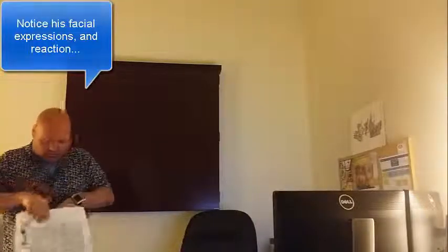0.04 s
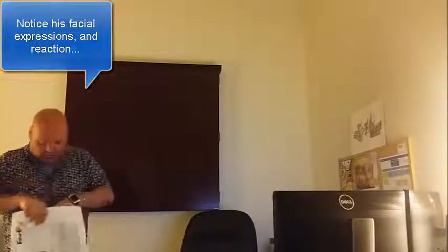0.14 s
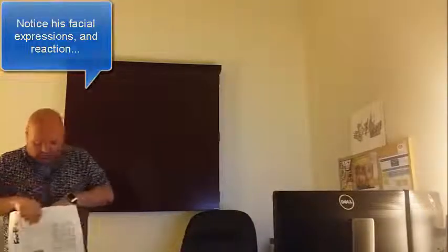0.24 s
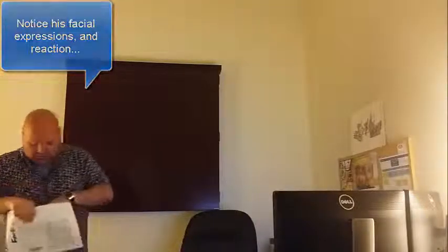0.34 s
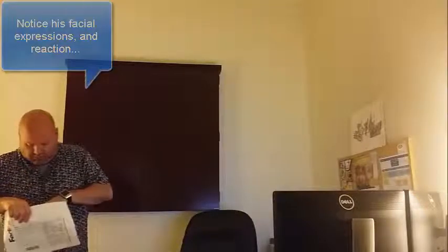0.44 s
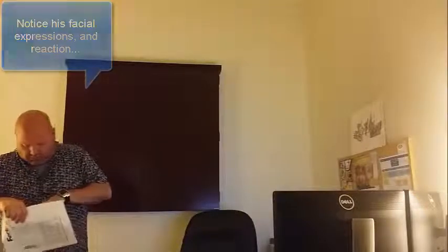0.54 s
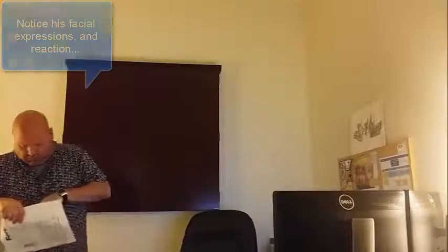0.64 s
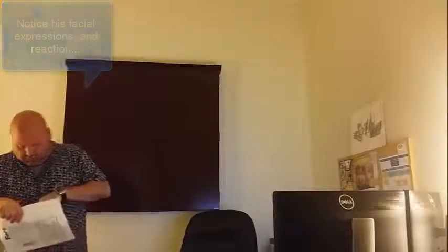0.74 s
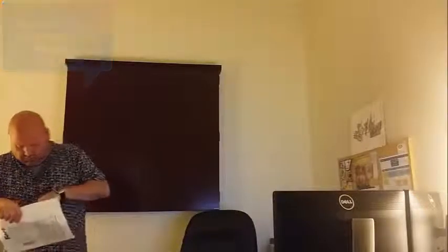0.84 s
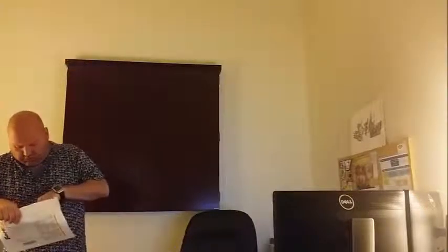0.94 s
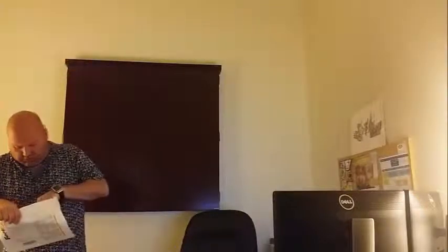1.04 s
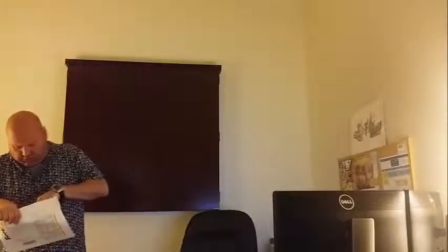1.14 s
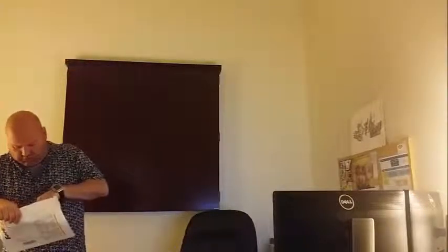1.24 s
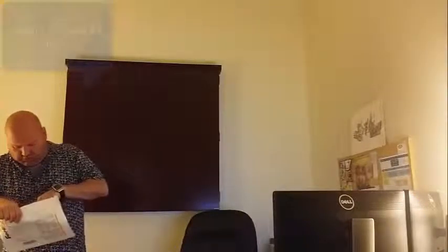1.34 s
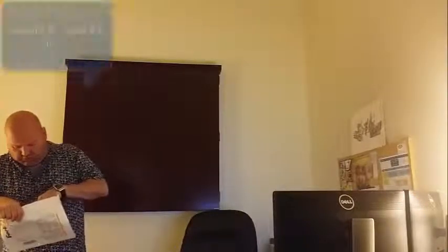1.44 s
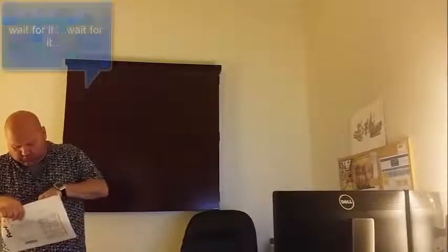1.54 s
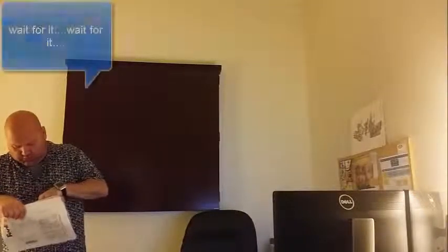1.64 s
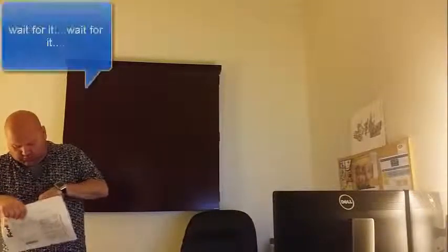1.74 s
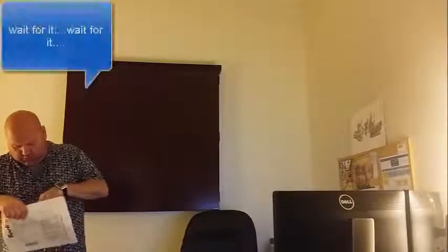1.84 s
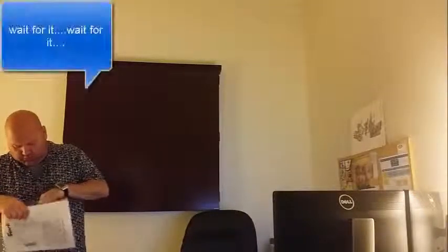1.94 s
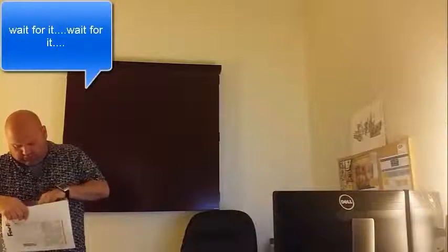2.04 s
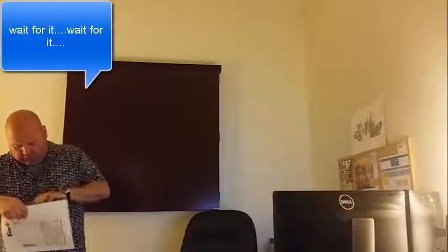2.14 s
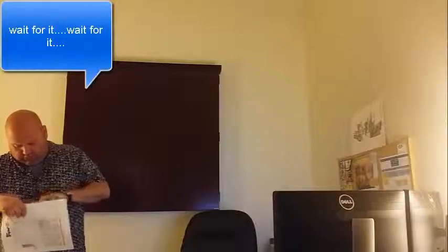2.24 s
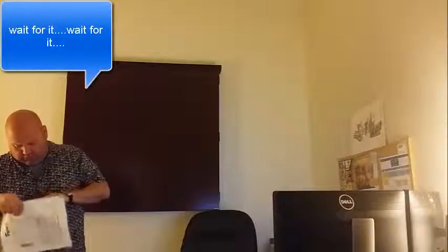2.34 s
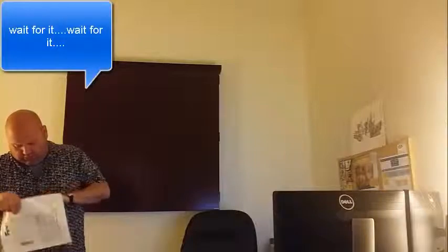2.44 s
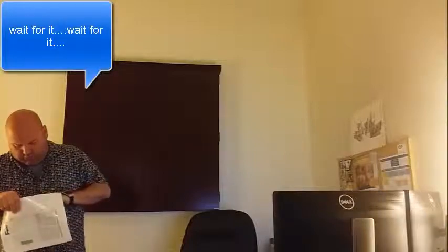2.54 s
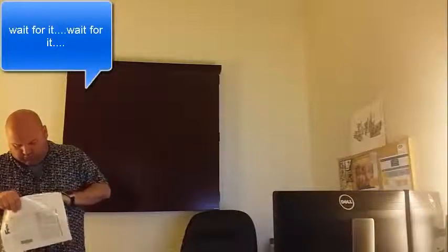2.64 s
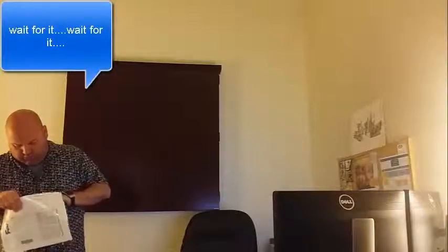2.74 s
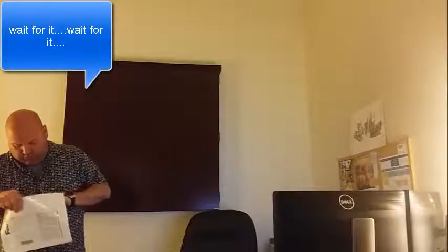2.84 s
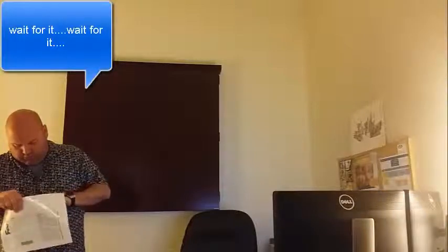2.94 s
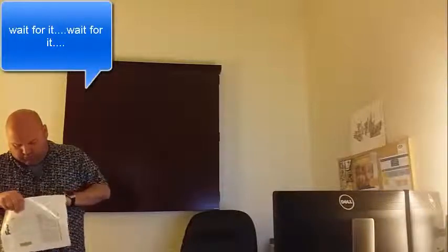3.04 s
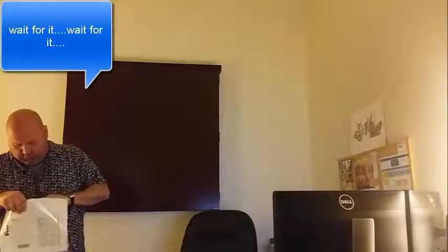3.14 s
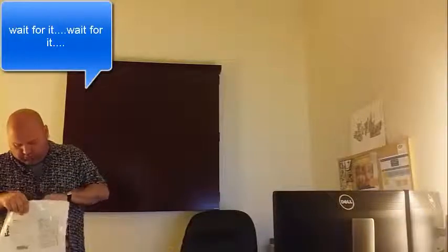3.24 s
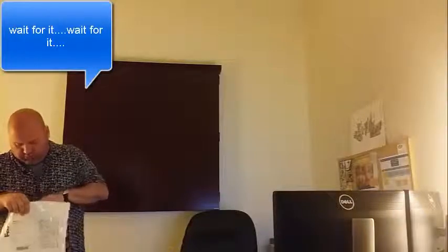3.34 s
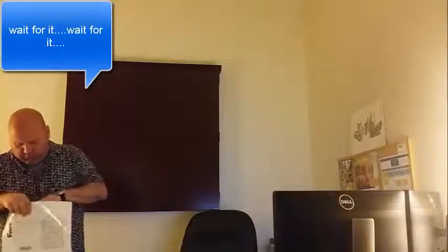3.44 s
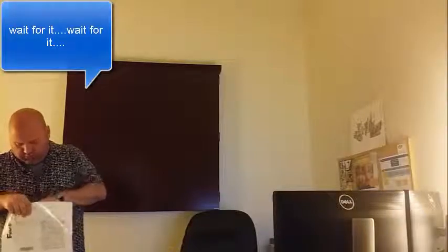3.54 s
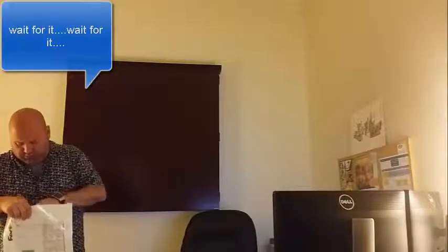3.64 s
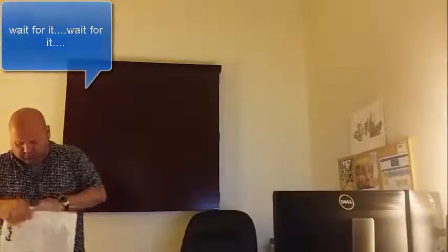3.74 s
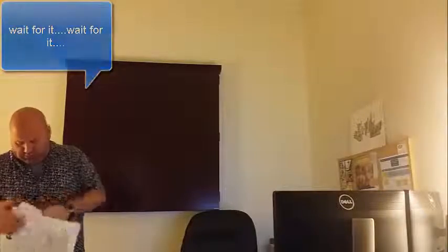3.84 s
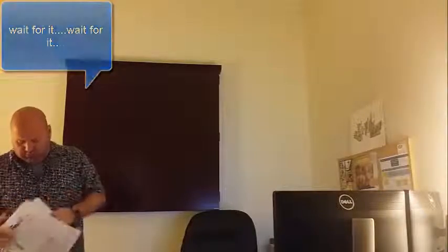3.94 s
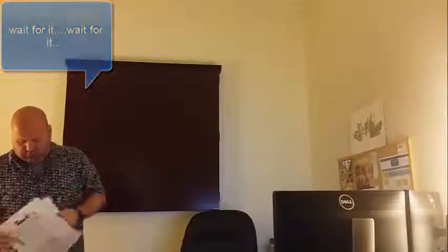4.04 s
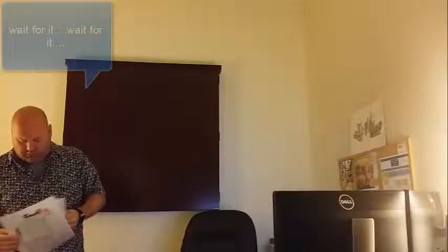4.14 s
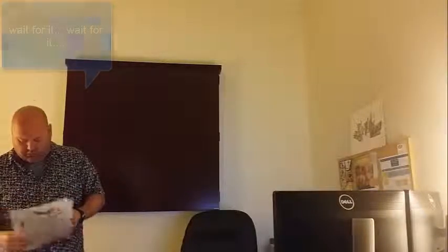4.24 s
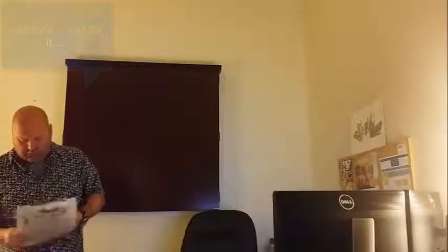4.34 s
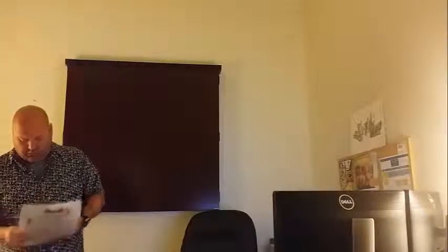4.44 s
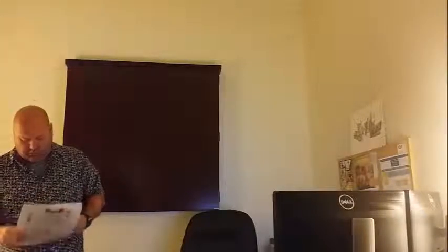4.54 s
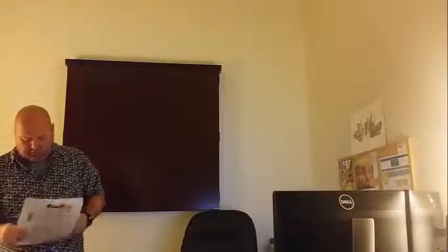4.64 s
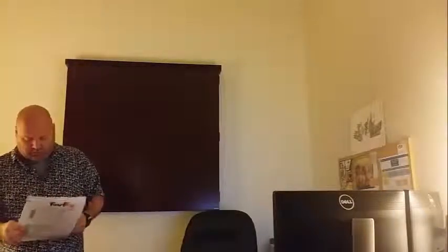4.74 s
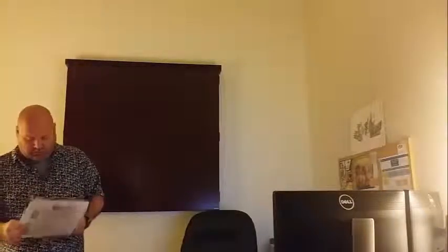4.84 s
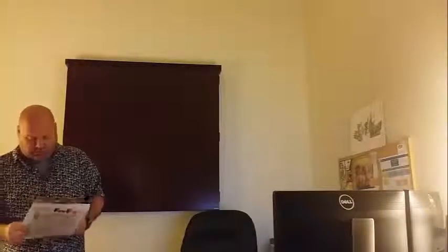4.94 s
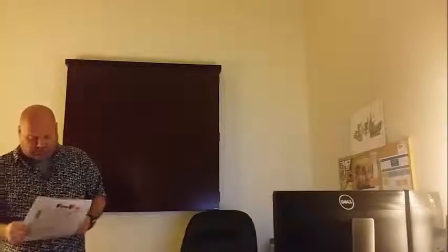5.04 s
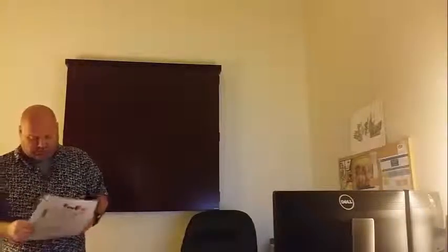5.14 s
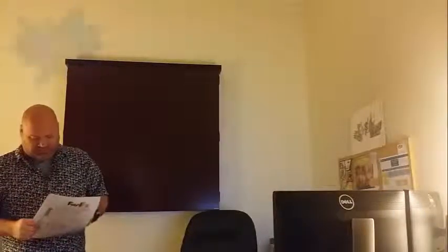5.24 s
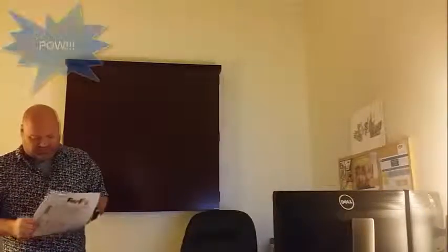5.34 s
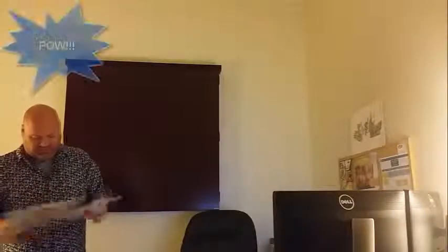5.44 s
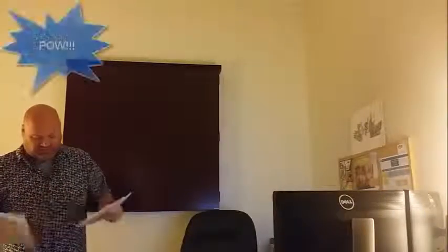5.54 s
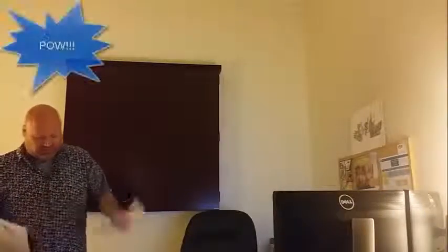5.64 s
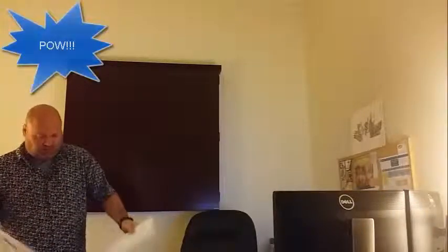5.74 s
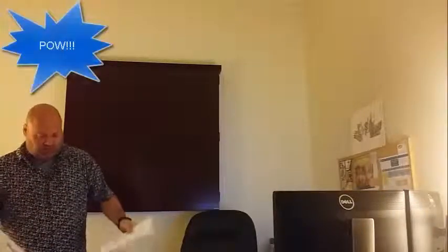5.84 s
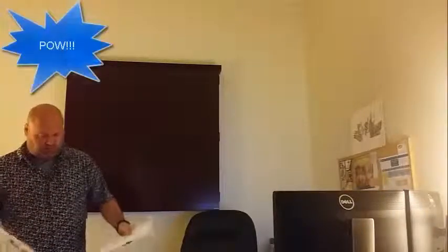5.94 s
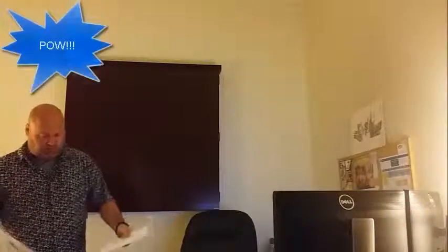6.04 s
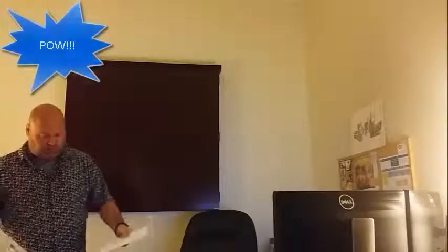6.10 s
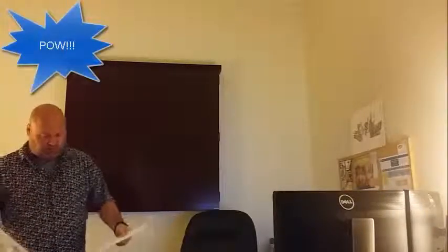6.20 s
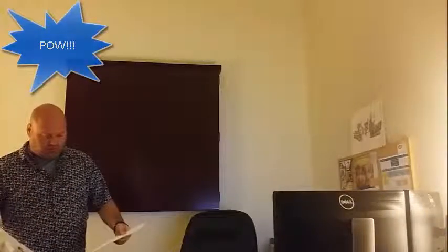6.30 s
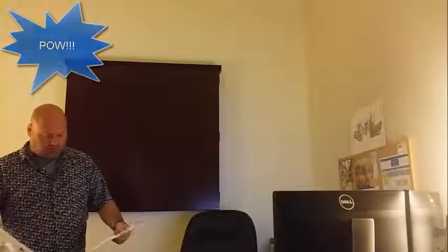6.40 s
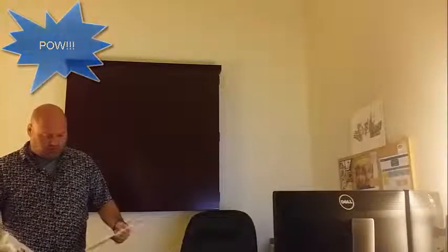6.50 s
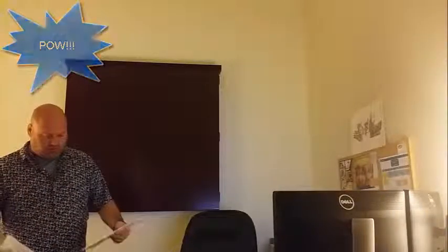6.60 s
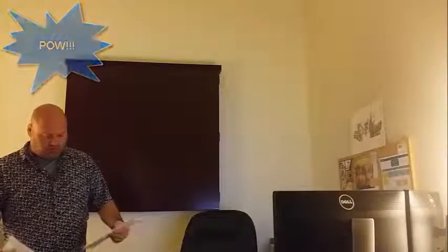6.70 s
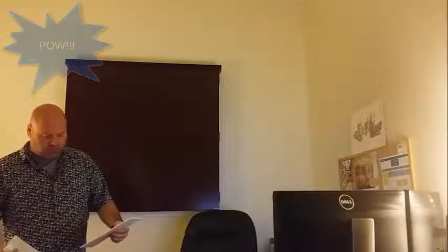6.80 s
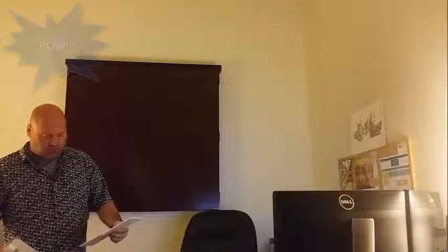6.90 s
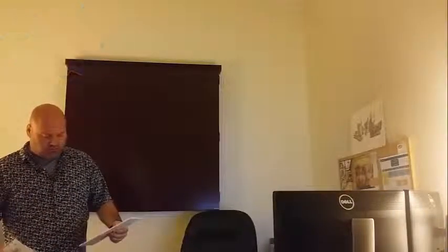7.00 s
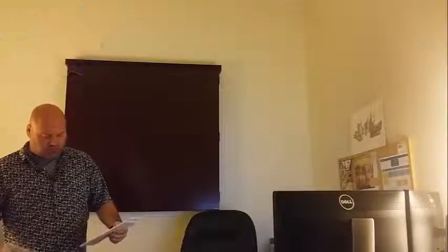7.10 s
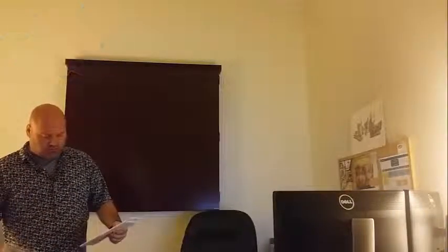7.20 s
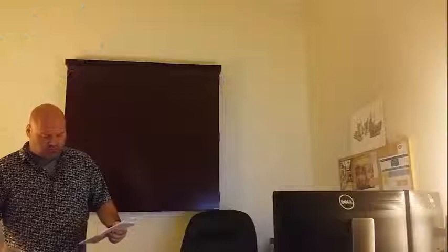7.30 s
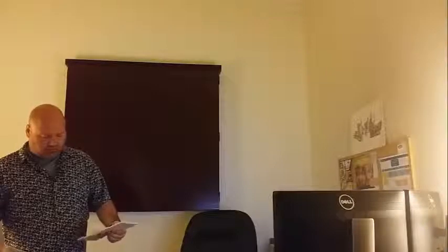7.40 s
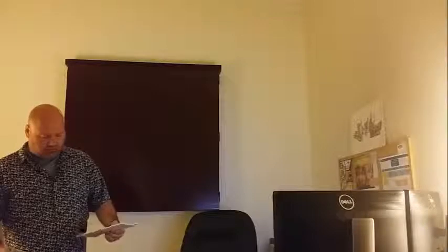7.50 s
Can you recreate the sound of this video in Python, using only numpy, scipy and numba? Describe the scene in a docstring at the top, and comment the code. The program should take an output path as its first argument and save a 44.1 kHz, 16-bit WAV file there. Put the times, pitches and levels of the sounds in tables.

```python
"""Small bare office: a stiff paper envelope is handled, then a popper inside it bangs and its shell drops on the desk.
Ventilation is shaped noise; finger strokes are uneven noise under envelopes, through changing room answers.
Snaps are short bursts plus dull notes; the bang is a filtered room answer with ringing, low modes and flutter.
The bang overloads the recorder, whose gain control ducks and slowly lets the room back in."""
import sys
import numpy as np
from scipy import signal
from scipy.fft import rfft, irfft, next_fast_len
from scipy.io import wavfile
from scipy.ndimage import map_coordinates
from numba import njit

SR = 44100
rng = np.random.default_rng(int(sys.argv[2]) if len(sys.argv) > 2 else 0)


def attenuation_scalar(level_db):
    """Turn a level in dB into a linear amplitude multiplier (20 dB per decade)."""
    decades = np.asarray(level_db, float) / 20
    return 10 ** decades


def log_audio(samples):
    """Write samples as a 16-bit WAV file to the path given in sys.argv[1]."""
    # one column per channel
    frames = np.atleast_2d(samples).T
    # limit to full scale, then quantise
    limited = np.clip(frames, -1, 1)
    pcm = np.round(limited * 32767).astype(np.int16)
    wavfile.write(sys.argv[1], SR, pcm)


N = 333528

# ventilation rumble spectrum: (frequency [Hz], relative density [dB])
RUMBLE_SPECTRUM = [(12, -54), (20, -40), (27, -33), (39, -16.5), (75, -12.5), (102, -3.5), (152, 1),
                   (237, -7), (269, -15), (347, -21), (379, -25.5), (420, -28.5), (550, -50.5), (920, -120)]
# ventilation hiss spectrum: (frequency [Hz], relative density [dB])
HISS_SPECTRUM = [(180, -23), (300, -3), (379, -18), (546, -2.5), (689, -11.5), (870, -0.5), (1030, 1),
                 (1840, -7), (2140, -12), (2320, -9), (2570, -14), (4520, -25), (11900, -31),
                 (14400, -33.5), (15200, -73.5)]
RUMBLE_DB, HISS_DB = -45, -53

# office reverberation: (frequency [Hz], decay by 60 dB [s])
OFFICE_T60 = [(100, 0.27), (300, 0.3), (1000, 0.67), (2000, 0.62), (4000, 0.72), (8000, 0.62),
              (14000, 0.46)]

# finger strokes over paper, the long faint ones are hands shifting their hold:
# (start [s], length [s], relative slide hiss level [dB], relative sheet body level [dB])
STROKES = [(0.0, .02, -83, -46), (0.034, 0.013, -45, -41.5), (0.05, 0.06, -64, -41),
           (0.182, 0.067, -57.5, -56), (0.27, 0.14, -67, -62), (0.563, 0.047, -67, -52),
           (0.62, 0.13, -75, -56), (0.824, 0.011, -66, -55), (1.015, 0.011, -62, -54),
           (1.604, 0.15, -72, -66), (1.968, 0.05, -54, -46), (2.061, 0.0047, -50.5, -38),
           (2.1, .25, -76, -67), (2.384, 0.018, -52.5, -38.5), (2.415, 0.034, -60, -62),
           (2.461, 0.0055, -66, -37), (3.14, 0.13, -66.5, -52.5), (3.328, 0.022, -64.5, -51.5),
           (3.405, 0.053, -72, -50.5), (3.47, 0.28, -59, -52), (3.769, 0.036, -46, -45),
           (3.846, 0.026, -50.5, -39), (4.062, 0.027, -61, -57), (4.11, .12, -66, -60),
           (4.233, 0.16, -57.5, -56.5), (4.364, 0.12, -56, -55), (4.46, 0.029, -52, -43),
           (4.51, 0.086, -55, -55), (4.57, 0.093, -51, -49), (4.93, 0.042, -80, -54.5),
           (5.121, 0.095, -61, -57), (5.241, 0.13, -51, -44.5), (5.46, .05, -54, -48.5),
           (7.302, .1, -78.5, -56), (7.5, .04, -70, -64)]
# fingers sliding on paper: (frequency [Hz], relative density [dB])
SLIDE_SPECTRUM = [(1180, -39), (2000, -4.5), (3170, -3), (4990, -4.5), (5580, -7), (8400, -2.5),
                  (14000, -17), (14700, -28), (15400, -74.5)]
# sheet body: (frequency [Hz], relative density [dB])
SHEET_SPECTRUM = [(150, -120), (280, 3.5), (600, -4), (950, 7.5), (1700, 0), (3000, -11.5), (6000, -120)]
RISE_DB_PER_S, FADE_DB_PER_S = 599, 450  # stroke onset and release

# snapping creases, the low-pitched ones are the envelope bumping hand or body:
# (time [s], relative crisp level [dB], dull level over crisp before pitch correction and trims [dB],
#  dull pitch [Hz], left over right [dB])
CREASE_SNAPS = [(0.0333, -37.5, 12.5, 870, -1.5), (0.0698, -40, 15, 950, -4), (0.4694, -50, -2, 1040, -4),
                (0.6894, -52, 2, 1230, -4), (0.8324, -49, -2, 571, -1), (1.039, -57, 17, 568, -3.0),
                (1.948, -49, 12.5, 630, -1), (2.0707, -50.5, 15.5, 1020, -12),
                (2.3927, -42.5, 16, 2900, -4), (2.4604, -44.5, 16, 970, -5), (3.2424, -57.5, 9, 340, -7),
                (3.3995, -58.5, 23, 296, -4), (3.8192, -40.5, 6, 500, -7), (4.2793, -41, 10, 1150, -7),
                (4.3044, -37.5, 10.5, 1450, -2), (4.47, -39, 6, 520, -1.5), (4.7397, -43, 17, 1440, -1),
                (4.797, -17.5, -0.5, 1514, -2.5), (5.097, -57, 12, 1470, -7)]
# popper's shell dropping on the desk, same columns
SHELL_LANDING = [(5.832, -38, 13, 1600, -2)]
# crisp part of a snap: (frequency [Hz], relative density [dB])
CREASE_SPECTRUM = [(1180, -41.5), (2000, -4), (3170, -5), (5580, -5.5), (8400, -2.5), (12000, -16.5),
                   (14600, -13.5), (16000, -36), (17000, -88)]

BANG_S, BANG_DB = 5.511, -8.5  # level: blast rms over its first 20 ms
# blast: (frequency [Hz], relative density [dB])
BLAST_SPECTRUM = [(29, -57), (50, -17.5), (225, -2.5), (310, -12), (566, -12), (1260, -3), (1390, -3),
                  (1900, -3.5), (2050, -5), (3670, -10), (4450, -2), (5670, -11.5), (6890, -6.5),
                  (15000, -22.5), (16500, -55)]
# thin panels ringing on, blurred, after the blast:
# (frequency [Hz], width [Hz], level over blast [dB], decay by 60 dB [s])
PANEL_RINGS = [(1750, 300, -13.5, .5), (4430, 70, -24, 0.95), (4400, 290, -25.5, 0.55),
               (5195, 200, -24, .6)]
# low modes of office and desk: (frequency [Hz], peak over blast rms [dB], decay by 60 dB [s])
LOW_MODES = [(76.2, -23, .1), (139, -9.5, 0.1), (220.8, -8, 0.11), (470.4, -12, 0.13)]
FLUTTER_PERIOD_S, FLUTTER_HZ, FLUTTER_T60_S = 0.0096, 1596, 0.0053
FLUTTER_DB, FLUTTER_LOSS_DB = 1, 1  # base over blast rms; loss per slap, the first included

OVERLOAD_PEAK, DUCK_DB, DUCK_DB_PER_S, HOLD_S, RECOVER_S = 0.3, -17.5, 80, 0.78, 0.31


def unit(x):
    """x at rms 1."""
    return x / np.sqrt(np.mean(x ** 2) + 1e-20)


def along(points, hz):
    """(frequency [Hz], value) points read on a log frequency axis."""
    f, v = np.transpose(points)
    return np.interp(np.log(hz + 1), np.log(f + 1), v)


def coloured(x, spectrum):
    """x through a causal minimum-phase filter, made by folding the cepstrum of the magnitude."""
    size = 2 * next_fast_len(N // 2 + 8192)
    magnitude = attenuation_scalar(along(spectrum, np.fft.rfftfreq(size, 1 / SR)))
    cepstrum = irfft(np.log(magnitude + 1e-6), size)
    cepstrum[1:size // 2] *= 2
    cepstrum[size // 2 + 1:] = 0
    return irfft(rfft(x, size) * np.exp(rfft(cepstrum)), size)[..., :N]


def wobble(knots_per_s):
    """Smooth random curve through normal knots, at most 19 a second."""
    knots = rng.standard_normal(int(N * 20 / SR) + 4)
    return map_coordinates(knots, [np.arange(N) * min(knots_per_s, 19) / SR])


def ports(alike, left_db):
    """White noise at two microphone ports with a given likeness and left-over-right balance."""
    a, b = rng.standard_normal((2, N))
    angle = np.arccos(np.clip(alike, 0, 1)) / 2
    shared, own = np.cos(angle) * a, np.sin(angle) * b
    return np.array([shared + own, shared - own]) * attenuation_scalar([[left_db / 2], [-left_db / 2]])


def ventilation():
    """Low duct rumble shared by both ports, plus a diffuse hiss; both levels waver."""
    rumble = unit(coloured(ports(alike=1.0, left_db=-4.0), RUMBLE_SPECTRUM))
    rumble *= attenuation_scalar(RUMBLE_DB + 0.43 * wobble(7.7))
    hiss = unit(coloured(ports(alike=0.16, left_db=-1.0), HISS_SPECTRUM))
    hiss *= attenuation_scalar(HISS_DB + 1.1 * wobble(6.7))
    return rumble + hiss


def office(x, early_db, direct_db=-16, size=SR // 2):
    """Near desk and walls answer first; each frequency of the tail dies at its own speed. New at each call."""
    hz, t, z = signal.stft(rng.standard_normal((2, size)), SR, nperseg=256)
    alike = 1 / (1 + (hz[:, None] / 260) ** 4)  # long waves reach both ports as one
    z[0] = alike * z[1] + np.sqrt(1 - alike ** 2) * z[0]
    z *= attenuation_scalar(1.3 * rng.standard_normal((2, 1, len(t))))  # separate reflections: lumpy answer

    def decaying(t60_s):
        return signal.istft(z * attenuation_scalar(-60 * t / t60_s), SR, nperseg=256)[1]

    late = decaying(along(OFFICE_T60, hz)[:, None])
    early = decaying(0.15)
    answer = late / np.linalg.norm(late[1]) + attenuation_scalar(early_db) * early / np.linalg.norm(early[1])
    answer[:, 0] += attenuation_scalar(direct_db)  # direct path
    return signal.fftconvolve(np.atleast_2d(x), answer, axes=1)


def handling():
    """Tiny slips of skin on paper, of somewhat varying sizes, excite slide hiss and sheet body."""
    t = np.arange(N) / SR
    power = np.zeros((2, N))
    for start_s, length_s, hiss_db, body_db in STROKES:
        rise_db = -RISE_DB_PER_S * np.maximum(start_s - t, 0)
        fade_db = -FADE_DB_PER_S * np.maximum(t - start_s - length_s, 0)
        power += attenuation_scalar([[hiss_db], [body_db]] + rise_db + fade_db) ** 2
    hiss, body = np.sqrt(power)
    slips = rng.standard_normal((2, N)) * attenuation_scalar(2.2 * rng.exponential(size=(2, N)))
    dry = hiss * unit(coloured(slips[0], SLIDE_SPECTRUM))
    dry += attenuation_scalar(-4.5) * body * unit(coloured(slips[1], SHEET_SPECTRUM))
    out, hop = np.zeros((2, N + 2 * SR)), SR // 12
    for start in range(0, N, hop):  # hands move, so the room's answer keeps changing
        wet = office(dry[start:start + hop], early_db=8.0)
        out[:, start:start + wet.shape[1]] += wet
    return out[:, :N] * attenuation_scalar(-9.0) * attenuation_scalar([[-1.2], [1.2]])


def snaps():
    """Creases and shell: very short bright burst, plus a short dull note of its own pitch."""
    crisp, dull = np.zeros((2, N + 2 * SR)), np.zeros((2, N + 2 * SR))
    t = np.arange(SR // 20) / SR
    for time_s, crisp_db, dull_db, dull_hz, pan_db in list(CREASE_SNAPS) + SHELL_LANDING:
        burst = rng.standard_normal(len(t)) * attenuation_scalar(-60 * t / 0.001)
        note = np.sin(2 * np.pi * dull_hz * t) * attenuation_scalar(-60 * t * dull_hz / 4.5)  # gone in a few cycles
        note *= 1 - np.exp(-t * dull_hz * 1.5)  # soft start
        dull_db += 10 * np.log10(1000 / dull_hz)  # a lower note lasts longer
        balance_db = np.array([[pan_db], [-pan_db]]) / 2
        for layer, sound, level_db in ((crisp, burst, crisp_db), (dull, note, crisp_db + dull_db)):
            wet = office(sound / np.linalg.norm(sound), early_db=9, direct_db=-7.5)
            layer[:, round(time_s * SR):][:, :wet.shape[1]] += wet * attenuation_scalar(level_db + balance_db)
    impulse = np.eye(1, N)[0]
    crease = coloured(crisp[:, :N], CREASE_SPECTRUM)
    crease /= np.linalg.norm(coloured(impulse, CREASE_SPECTRUM))  # filter at unit energy
    return attenuation_scalar(6.0) * crease + attenuation_scalar(4.5) * dull[:, :N]


def bang():
    """Sharp blast fills the office, kicks low modes, rings thin panels, slaps between two facing surfaces."""
    out, start = np.zeros((2, N + 2 * SR)), round(BANG_S * SR)
    t = np.arange(2 * SR) / SR
    wet = office([1.], early_db=-29.0, size=SR)
    out[:, start:][:, :wet.shape[1]] = wet
    out = coloured(out, BLAST_SPECTRUM)
    out /= np.sqrt(np.mean(out[:, start:][:, :SR // 50] ** 2))
    after = out[:, start:]  # view into out
    f = np.fft.rfftfreq(len(t), 1 / SR)
    for hz, width_hz, db, t60_s in PANEL_RINGS:
        noise = rng.standard_normal((2, len(t)))
        band = irfft(rfft(noise) * np.exp(-((f - hz) / width_hz) ** 2), len(t))
        after[:, :len(t)] += attenuation_scalar(db - 60 * t / t60_s) * unit(band)
    for hz, db, t60_s in LOW_MODES:
        after[:, :len(t)] += attenuation_scalar(db - 60 * t / t60_s) * np.sin(2 * np.pi * hz * t)
    for k in range(1, 7):
        slap_db = FLUTTER_DB - FLUTTER_LOSS_DB * k - 60 * t / FLUTTER_T60_S
        slap = attenuation_scalar(slap_db) * np.sin(2 * np.pi * FLUTTER_HZ * t)
        delay = round(k * FLUTTER_PERIOD_S * SR) - SR // 500  # whole train 2 ms early
        after[:, delay:][:, :SR] += slap[:SR]
    return attenuation_scalar(BANG_DB) * out


def scene():
    """All sources at the two microphone ports."""
    return ventilation() + handling() + snaps() + bang()


@njit
def ducking(peak, limit, depth_db, fall_db, hold, recover):
    """Gain [dB]: overload pulls it down at a steady rate, it holds, then eases back. Times in samples."""
    gain_db, now_db, left = np.zeros(len(peak)), 0., 0.
    for i in range(len(peak)):
        left = hold if peak[i] > limit else left - 1
        now_db = max(now_db - fall_db, depth_db) if left > 0 else now_db * (1 - recover)
        gain_db[i] = now_db
    return gain_db


def band_limit(x):
    """A steep low-pass at the top of the band."""
    return signal.sosfilt(signal.butter(12, 16660, fs=SR, output="sos"), x)


def record(dry):
    """Microphone without deep bass, gain control, then an overloaded converter that saturates."""
    dry = signal.sosfilt(signal.butter(2, 40, "high", fs=SR, output="sos"), dry)
    peak = np.abs(dry).max(0)
    gain_db = ducking(peak, OVERLOAD_PEAK, DUCK_DB, DUCK_DB_PER_S / SR, HOLD_S * SR, 1 / (RECOVER_S * SR))
    ducked = dry * attenuation_scalar(gain_db)
    mix = ducked / (1 + np.abs(ducked / 0.58) ** 8) ** (1 / 8)  # ceiling 0.58
    return band_limit(mix)


dry = scene()
out = record(dry)
log_audio(out)
```